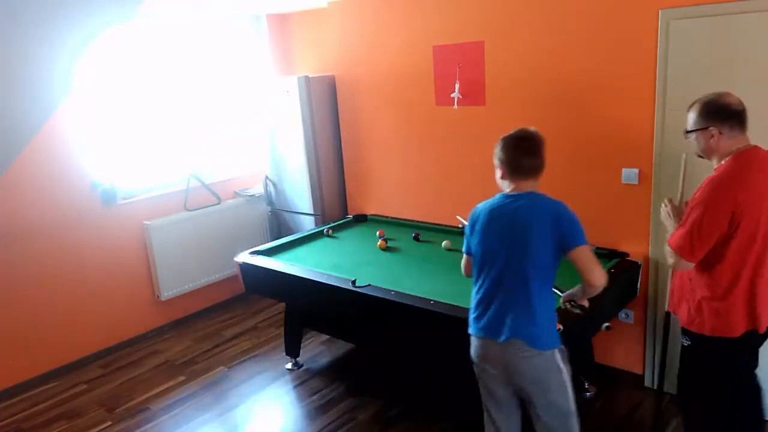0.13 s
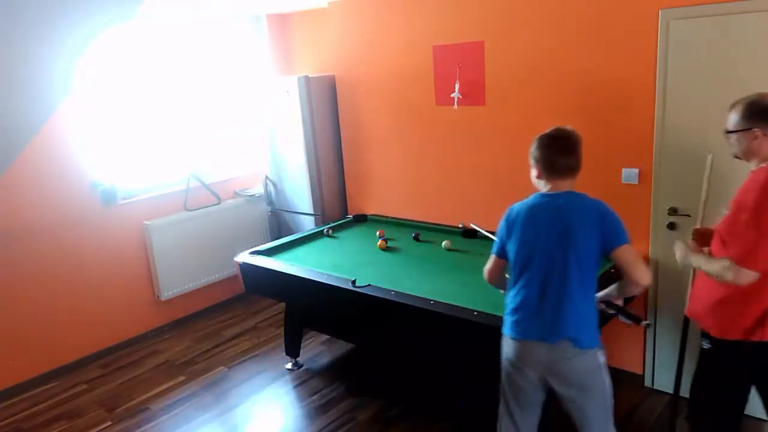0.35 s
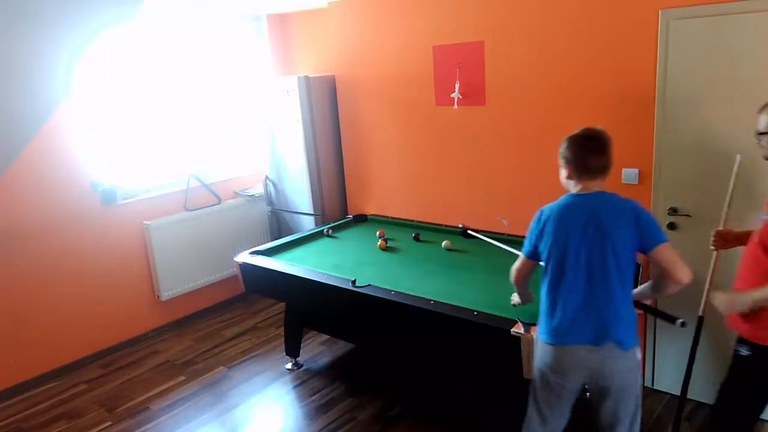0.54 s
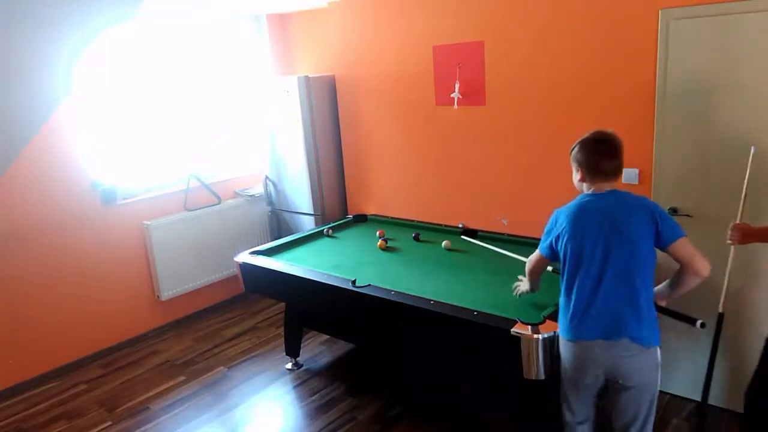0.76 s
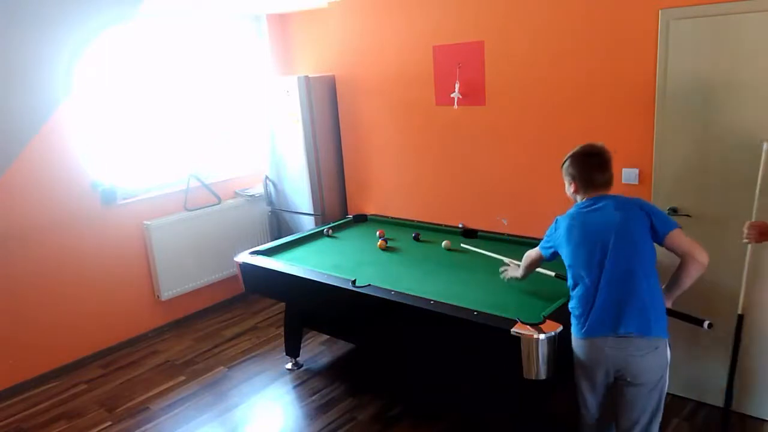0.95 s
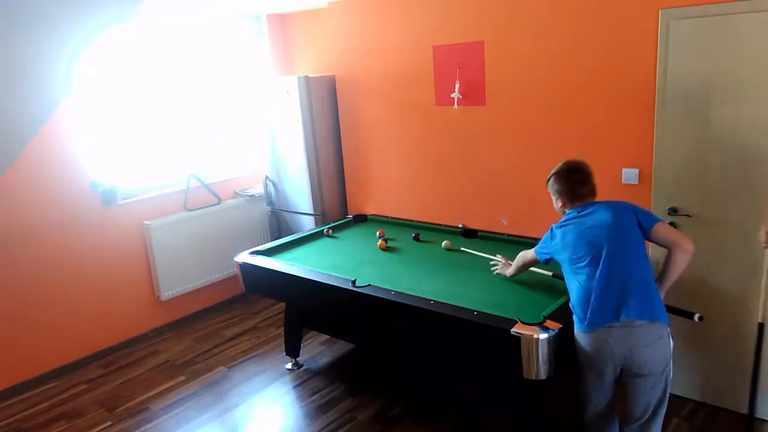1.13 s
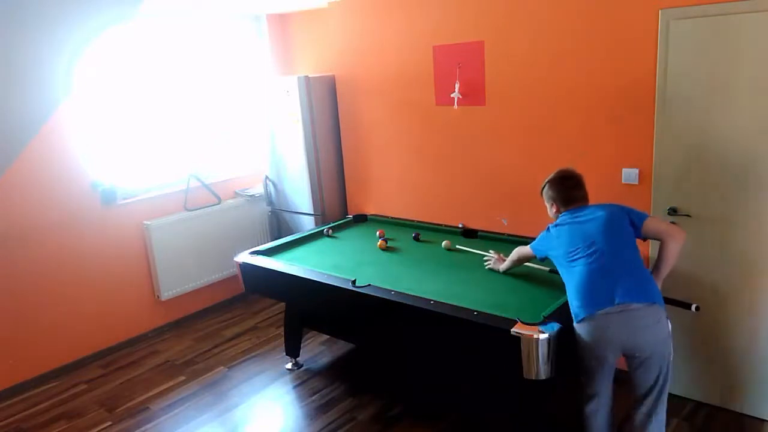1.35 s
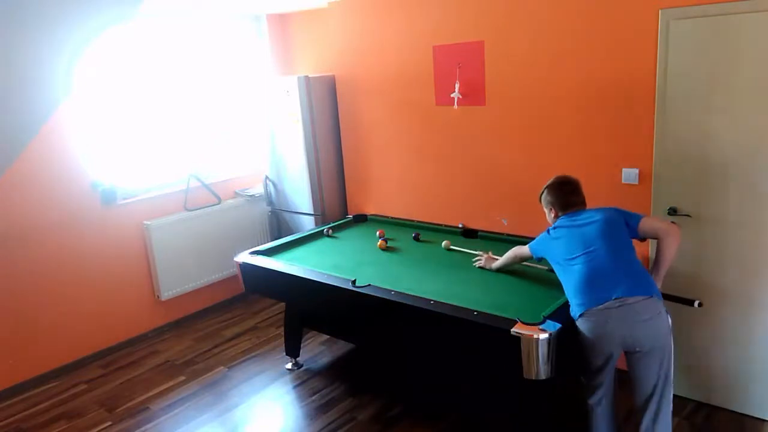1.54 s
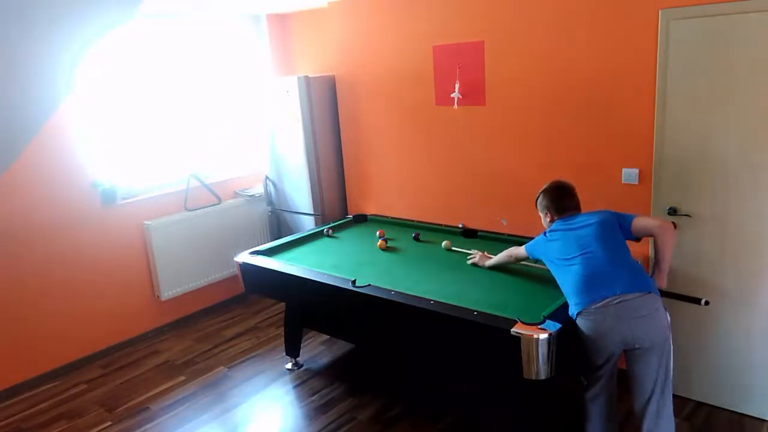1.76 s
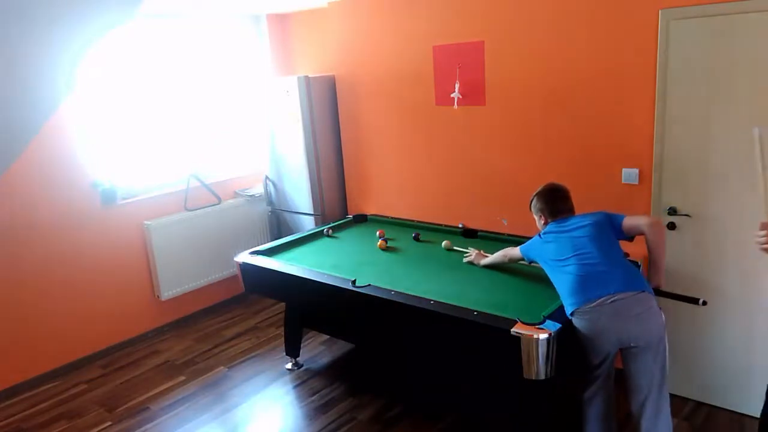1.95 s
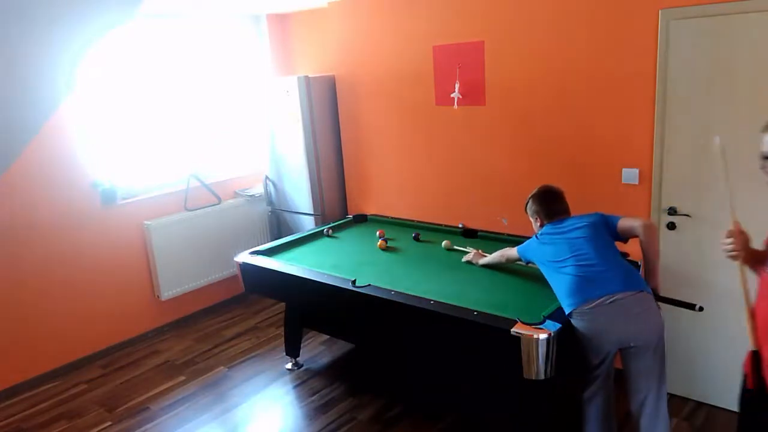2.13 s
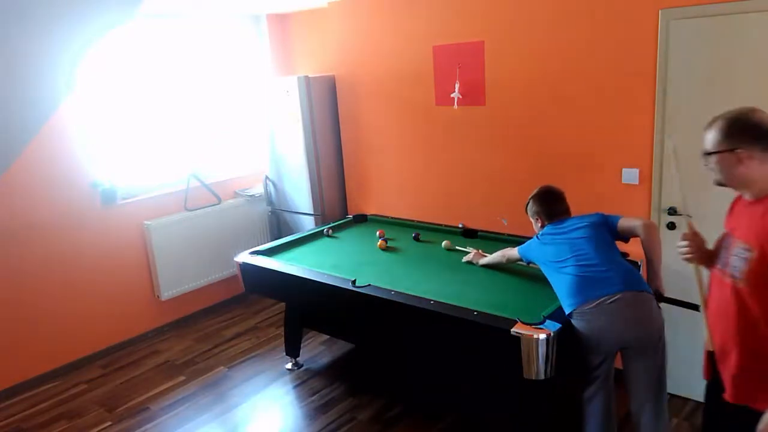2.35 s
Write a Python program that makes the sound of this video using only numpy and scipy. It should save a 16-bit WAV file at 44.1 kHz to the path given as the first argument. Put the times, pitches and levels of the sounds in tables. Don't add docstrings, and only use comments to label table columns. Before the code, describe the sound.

Pool cue and table knocks in a bare, echoing home room: low rail bumps, a loud hard drop, a sharp shaft knock, then butt taps and a short ball clack; cloth rustles, left microphone clear, right muffled.

```python
import sys
import numpy as np
from scipy import signal
from scipy.fft import rfft, irfft, next_fast_len
from scipy.io import wavfile
from scipy.ndimage import uniform_filter1d, map_coordinates

SR = 44100
rng = np.random.default_rng(int(sys.argv[2]) if len(sys.argv) > 2 else 0)


def natural_amplitude(level_db):
    exponent = np.asarray(level_db, float) / 20
    return 10 ** exponent


def wrap_up_sound(samples):
    columns = np.atleast_2d(samples).T
    tamed = np.clip(columns, -1, 1)
    steps = np.round(tamed * 32767).astype(np.int16)
    wavfile.write(sys.argv[1], SR, steps)


N = 105840
LEAD = SR // 2

# [f/Hz, density/dB per Hz]
TAP_COLOUR = [(71, -71), (120, -18.5), (280, -5.5), (480, -6.5), (700, -13.5), (1100, -20), (1930, -34.5),
              (3300, -44.5), (5000, -58), (6500, -80), (11000, -110)]


def unit(x):
    return x / np.sqrt(np.mean(x ** 2) + 1e-20)


def along(points, hz):
    f, v = np.transpose(points)
    return np.interp(np.log(hz + 1), np.log(f + 1), v)


def closed(points, hz):
    below, above = (points[0][0] / 2, -90), (points[-1][0] * 3.1, -110)
    return natural_amplitude(along([below] + list(points) + [above], hz))


def filtered(x, response):
    m = next_fast_len(x.shape[-1] + 8192)
    spectrum = rfft(x, m) * response(np.fft.rfftfreq(m, 1 / SR))
    return irfft(spectrum, m)[..., :x.shape[-1]]


def minimal(gain):
    half = len(gain) - 1
    cepstrum = irfft(np.log(gain + 1e-6))
    fold = np.r_[1, 2 * np.ones(half - 1), 1, np.zeros(half - 1)]
    return np.exp(rfft(cepstrum * fold))


def resonance(hz, centre_hz, width_hz):
    damping = 1j * hz * width_hz
    return damping / (centre_hz ** 2 - hz ** 2 + damping)


def wobble(rate_hz):
    knots = rng.standard_normal(int(N * rate_hz / SR) + 4)
    return map_coordinates(knots, [np.arange(N) * rate_hz / SR])


def noise(spectrum, channels, patchy_db):
    z = signal.stft(rng.standard_normal((channels, N)), nperseg=512)[2]
    field = uniform_filter1d(rng.standard_normal(z.shape[1:]), size=6, axis=0)
    field = uniform_filter1d(field, size=12, axis=1)
    x = signal.istft(z * natural_amplitude(patchy_db * unit(field)), nperseg=512)[1][:, :N]
    return unit(filtered(x, lambda hz: closed(spectrum, hz)))


def room(wet_db, nook_db):
    # [f/Hz, t60/s]
    ring = [(60, 0.74), (200, 0.72), (420, 0.41), (800, 0.72), (2000, 0.71), (6000, 0.61), (10000, 0.55),
            (15000, 0.66)]
    build_s, nook_s = 0.0074, 0.035
    walls_s, walls_db = 0.03, -7

    hz, t, z = signal.stft(rng.standard_normal((2, SR)), SR, nperseg=256)
    decay = natural_amplitude(-60 * t / along(ring, hz)[:, None])
    tail = signal.istft(z * decay, SR, nperseg=256)[1][:, :SR]
    age_s = np.arange(SR) / SR
    tail = tail * (1 - np.exp(-age_s / build_s)) * (1 + natural_amplitude(nook_db) * np.exp(-age_s / nook_s))
    path = natural_amplitude(wet_db) * tail / np.linalg.norm(tail[0])
    path[:, 0] += 1

    delay, sign = rng.random((14, 2)).T
    at = (SR * walls_s * (.1 + delay)).astype(int)
    path[:, at] += natural_amplitude(walls_db) * (2 * sign - 1) * natural_amplitude(-9 * delay + 4.0)
    return path


def knocks(contacts, tone, modes, wet_db, nook_db, size=16384):
    out = np.zeros((2, N + LEAD + 3 * SR))
    t, hz = np.arange(size) / SR, np.fft.rfftfreq(size, 1 / SR)
    colour = minimal(closed(tone, hz))
    for s, db, length_s in contacts:
        push = rfft(rng.standard_normal(size) * (t / length_s) ** 2 * np.exp(-t / length_s * 2))
        smear = push / minimal(np.abs(push))
        body = 1
        for f, rise_db, t60 in modes:
            width_hz = np.log(1000) / np.pi / t60
            body = body + natural_amplitude(rise_db + rng.normal(0, 3.13)) * resonance(hz, f, width_hz)
        blow = irfft(colour * body * smear) * natural_amplitude(-60 * t / 0.12)
        blow = blow[None] / np.linalg.norm(blow)
        wet = signal.fftconvolve(blow, room(wet_db, nook_db), axes=1)
        out[:, LEAD + round(s * SR):][:, :wet.shape[1]] += natural_amplitude(db + 29.5) * wet
    return out[:, LEAD:LEAD + N]


def friction(strokes, tone):
    level = 0
    for s, db, rise_s, t60 in strokes:
        age_s = np.maximum(np.arange(N) / SR - s, 0)
        level = level + natural_amplitude(db - 60 * age_s / t60) * (1 - np.exp(-(age_s / rise_s) ** 2))
    return level * natural_amplitude(0.2 * wobble(22)) * noise(tone, channels=2, patchy_db=1.5)


def earlier_knock():
    # [t/s, level/dB, length/s]
    contacts = [
        (-0.29, -33, 0.027),
    ]
    # [f/Hz, density/dB per Hz]
    tone = [(41, -8.5), (70, 12), (190, 1.5), (560, 3), (900, -10), (2000, -9), (6570, -29), (15500, -42)]
    return knocks(contacts, tone, [], wet_db=12.5, nook_db=-16.5)


def clothes():
    # [t/s, level/dB, rise/s, t60/s]
    strokes = [(-.1, -43, 0.071, 1), (.145, -58.5, .02, 0.487), (0.176, -40.5, 0.0024, 0.94),
               (0.699, -47, 0.0195, 0.43), (1.0, -40, 0.096, 0.24), (1.385, -48.5, 0.064, 1),
               (1.46, -52, 0.072, 0.56), (1.75, -48, 0.11, 0.81), (2.12, -36, 0.038, 0.3)]
    # [f/Hz, density/dB per Hz]
    tone = [(2500, -13.5), (4000, -8.5), (6200, -5), (9000, -16), (12000, -21.5), (15500, -24.5)]
    return friction(strokes, tone)


def air():
    # [f/Hz, density/dB per Hz]
    air_tone = [(15, -54), (25, -10.5), (53, 0), (209, -17.5), (457, -12.5), (2770, -25.5), (7100, -14),
                (12500, -25), (15500, -83)]
    # [f/Hz, density/dB per Hz]
    rumble_tone = [(25, -40.5), (38, -13.5), (50, -17), (80, -19.5), (150, -41.5)]
    air_db, rumble_db = -62.5, -59.5
    rumble = natural_amplitude(rumble_db + .8 * wobble(8.5)) * noise(rumble_tone, channels=2, patchy_db=5.5)
    return natural_amplitude(air_db) * noise(air_tone, channels=2, patchy_db=0.8) + rumble


def steps():
    # [t/s, level/dB, length/s]
    contacts = [(.0, -58, 0.015), (.18, -43.5, 0.019), (.4, -39.5, 0.017), (.55, -48, 0.034),
                (1.14, -58.5, 0.01), (1.68, -59, 0.025), (1.735, -55.5, 0.05), (1.81, -60, 0.021),
                (1.89, -57, 0.018), (2.175, -47, 0.022), (2.23, -55, 0.01)]
    # [f/Hz, density/dB per Hz]
    tone = [(30, -40), (48, -8.5), (65, -5.5), (95, -15.5), (160, -26)]
    return knocks(contacts, tone, [], wet_db=-0.5, nook_db=14.5)


def rail_bumps():
    # [t/s, level/dB, length/s]
    contacts = [(.173, -36.5, 0.0085), (.184, -31.5, 0.0094), (.199, -30, 0.0063), (.238, -39.5, 0.0068),
                (.254, -32.5, 0.0097), (.275, -37, .006)]
    # [f/Hz, density/dB per Hz]
    tone = [(50, -1.5), (110, -12), (200, -2), (290, -8.5), (480, -11.5), (720, -12.5), (1000, -19),
            (2800, -25.5), (6500, -34.5), (15500, -64)]
    # [f/Hz, rise over colour/dB, t60/s]
    rail = [(193, 13.5, 0.18), (296.5, 14, 0.062), (130, 3, 0.1), (600, -5.5, 0.046), (718, 7.5, 0.1),
            (1370, -3, 0.023)]
    return knocks(contacts, tone, rail, wet_db=3.5, nook_db=-15.5)


def frame_drop():
    # [t/s, level/dB, length/s]
    contacts = [
        (.368, -29.5, 0.0029),
        (.3735, -18, 0.003),
        (.391, -27, 0.0043),
        (.428, -30.5, 0.0042),
    ]
    # [f/Hz, density/dB per Hz]
    tone = [(41, -87.5), (70, -9.5), (170, -8.5), (284, -3), (478, -7.5), (822, -5), (1180, -13),
            (2000, -18.5), (6570, -32.5), (15500, -44.5)]
    # [f/Hz, rise over colour/dB, t60/s]
    frame = [(190, 11, 0.4), (273, 9.3, 0.12), (322, 2.1, 0.25), (375, 10, 0.16), (586, 1.9, .1),
             (714, 5.6, 0.23), (820, 2.8, 0.33), (956, 4, 0.071), (1262, 5.7, 0.087), (1370, 1.8, 0.23)]
    # [t/s, level/dB, length/s]
    crack = [
        (.3695, -25.5, 0.0021),
        (.3735, -26.5, 0.0011),
        (.3762, -29.5, 0.00039),
    ]
    # [f/Hz, density/dB per Hz]
    crack_tone = [(500, -11), (1400, 4), (3000, -8.5), (6500, -10.5), (15500, -44.5)]
    dull = knocks(contacts, tone, frame, wet_db=9.5, nook_db=-11.5)
    return dull + knocks(crack, crack_tone, [], wet_db=1.5, nook_db=-10.5)


def shaft_knock():
    # [t/s, level/dB, length/s]
    through_floor = [
        (1.145, -39, 0.0056),
        (1.149, -38, 0.0016),
    ]
    # [t/s, level/dB, length/s]
    contacts = [
        (1.152, -23.5, 0.00126),
        (1.162, -27, 0.0037),
        (1.328, -46.5, 0.0023),
    ]
    # [f/Hz, density/dB per Hz]
    tone = [(59, -66.5), (100, -18), (280, -7), (440, -3), (950, -16.5), (1180, -21), (1600, -22),
            (2150, -28.5), (3300, -31), (6530, -36.5), (15500, -53.5)]
    # [f/Hz, rise over colour/dB, t60/s]
    shaft = [(278, 1.3, 0.19), (406, 6.5, 0.049), (565, 5.9, 0.04), (822, 4, 0.015), (1470, 2, 0.03),
             (1750, 5.1, 0.01), (2490, 8.8, 0.011), (3240, 6, 0.013), (4130, 4.3, 0.027)]
    dull = knocks(through_floor, TAP_COLOUR, [], wet_db=13.0, nook_db=4.5)
    return dull + knocks(contacts, tone, shaft, wet_db=6.5, nook_db=-3)


def cue_slide():
    # [t/s, level/dB, rise/s, t60/s]
    strokes = [
        (1.5, -56.5, 0.049, 1.9),
        (1.65, -71, 0.13, 0.89),
    ]
    # [f/Hz, density/dB per Hz]
    tone = [(500, -16), (750, 4), (950, -10), (2000, -12), (3500, -16)]
    return friction(strokes, tone)


def butt_taps():
    # [t/s, level/dB, length/s]
    contacts = [(1.874, -34, 0.0038), (1.884, -29, 0.0038), (1.905, -36, 0.0053), (1.945, -47, 0.0025),
                (2.003, -54.5, 0.0036), (2.04, -47.5, 0.0044), (2.083, -38.5, 0.007),
                (2.225, -51.5, 0.0084), (2.33, -56, 0.0028)]
    # [f/Hz, rise over colour/dB, t60/s]
    butt = [(282, 6.1, 0.072), (372, 5.2, 0.025), (550, 5.7, 0.059), (778, 3.3, 0.025), (1900, 11.8, 0.04),
            (2620, 5.7, 0.012), (3100, 5, 0.012)]
    return knocks(contacts, TAP_COLOUR, butt, wet_db=8, nook_db=-7.0)


def ball_clack():
    # [t/s, level/dB, length/s]
    contacts = [
        (2.103, -42.5, 0.0011),
        (2.1068, -29, 0.00209),
        (2.122, -40.5, 0.00096),
    ]
    # [f/Hz, density/dB per Hz]
    tone = [(300, -32), (700, -4.5), (1080, -5.5), (1300, -4.5), (1850, -6), (2450, -1.5), (2650, -5.5),
            (2900, -20), (6500, -31.5), (15500, -36.5)]
    # [f/Hz, rise over colour/dB, t60/s]
    ball = [(1356, 5.3, 0.13), (1522, 4.5, 0.099), (1690, 3.7, 0.074), (2110, 4, 0.058), (2280, 2, 0.068),
            (2506, 4.9, 0.064), (3330, 9.7, 0.038), (3830, 3.5, 0.085)]
    return knocks(contacts, tone, ball, wet_db=4.5, nook_db=-44)


def open_port(near):
    return filtered(near, lambda hz: 1 + natural_amplitude(0.5) * resonance(hz, centre_hz=6630, width_hz=910))


def covered_port(near, other):
    # [f/Hz, gain/dB]
    loss = [(50, -7), (130, -11.5), (300, -24), (700, -27), (2500, -23.5), (3500, -65), (5000, -124),
            (15000, -55)]
    # [f/Hz, share/1]
    common = [(60, 0.15), (400, 1), (1000, 0.17), (3000, 0.44)]
    lag_s = 0.00064

    def cover(hz):
        return natural_amplitude(along(loss, hz)) * np.exp(-2j * np.pi * hz * lag_s)

    def share(hz):
        return np.clip(along(common, hz), 0, 1)

    same = filtered(near, lambda hz: cover(hz) * share(hz))
    return same + filtered(other, lambda hz: cover(hz) * np.sqrt(1 - share(hz) ** 2))


def scene():
    struck = earlier_knock() + steps() + rail_bumps() + frame_drop() + shaft_knock() + butt_taps() + ball_clack()
    near, other = struck + clothes() + cue_slide() + air()
    return np.array([open_port(near), covered_port(near, other)])


def port_hiss():
    # [f/Hz, density/dB per Hz]
    tone = [(30, 31), (100, 16), (500, 11.5), (2000, -3), (10000, -13), (12500, -7), (15500, -44)]
    return natural_amplitude(-66) * noise(tone, channels=2, patchy_db=0.8)


def whine():
    whine_hz, whine_db = 9380, -100
    line = natural_amplitude(whine_db) * np.sin(2 * np.pi * whine_hz * np.arange(N) / SR)
    return np.array([[0], [1]]) * line


def band_limit(x):
    return signal.sosfilt(signal.butter(12, 15780, fs=SR, output="sos"), x)


def record(dry):
    top_hz = 15800
    x = dry + port_hiss() + whine()
    mix = filtered(x, lambda hz: hz < top_hz)
    return band_limit(mix)


dry = scene()
out = record(dry)
wrap_up_sound(out)
```